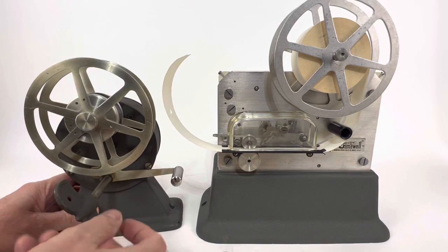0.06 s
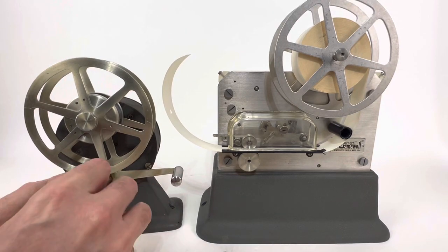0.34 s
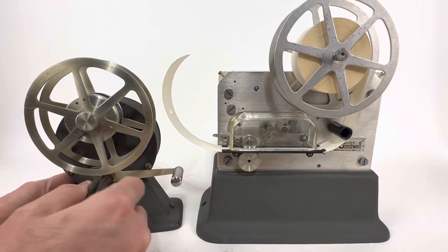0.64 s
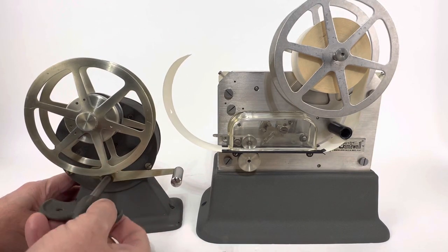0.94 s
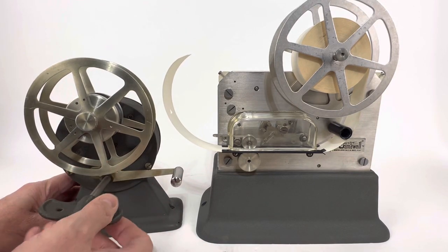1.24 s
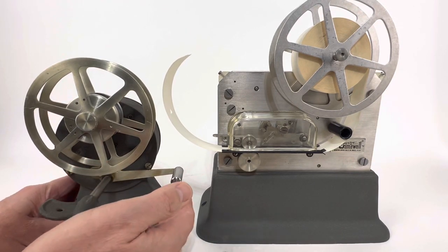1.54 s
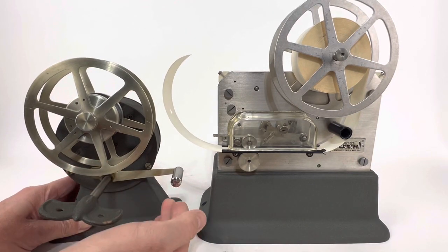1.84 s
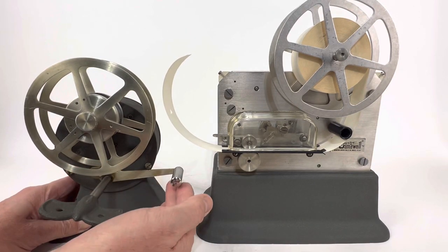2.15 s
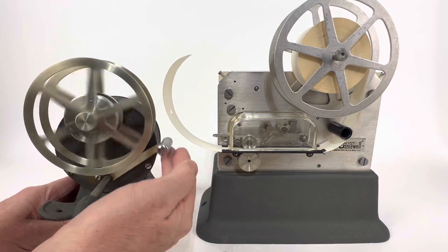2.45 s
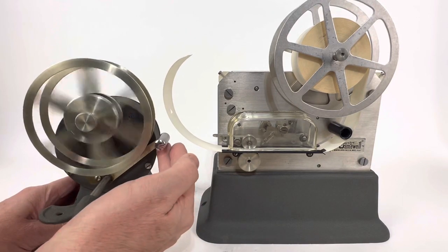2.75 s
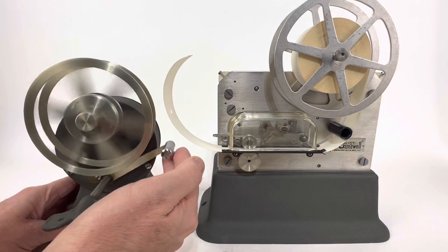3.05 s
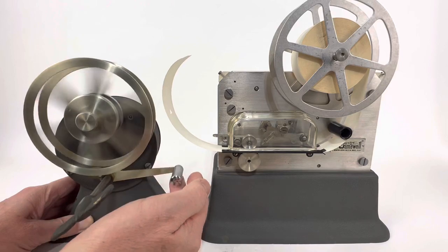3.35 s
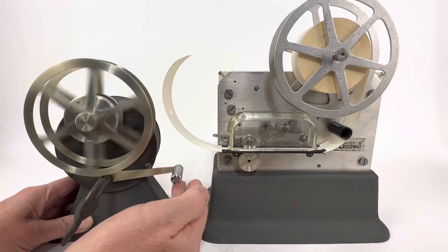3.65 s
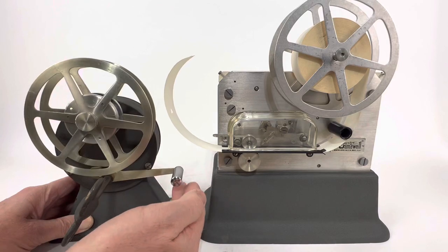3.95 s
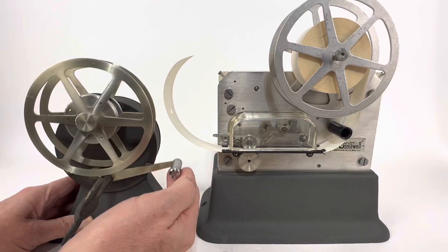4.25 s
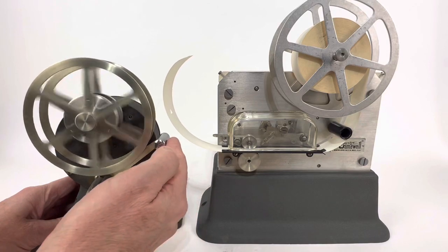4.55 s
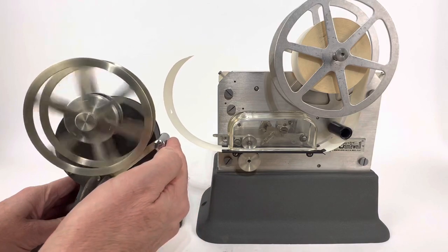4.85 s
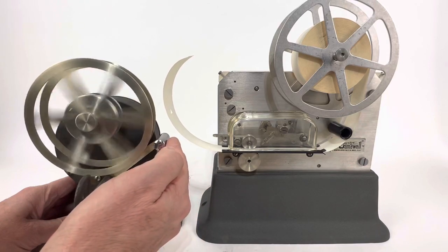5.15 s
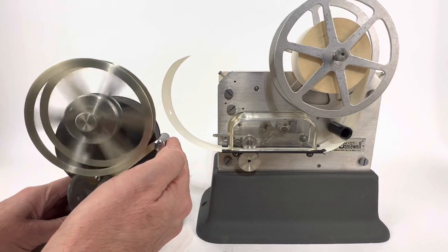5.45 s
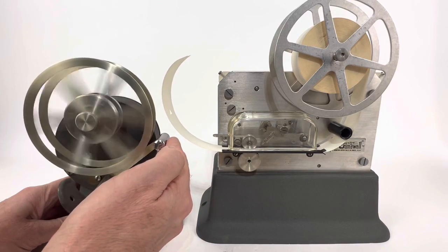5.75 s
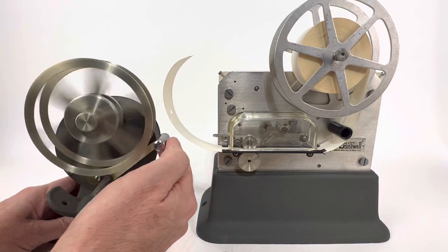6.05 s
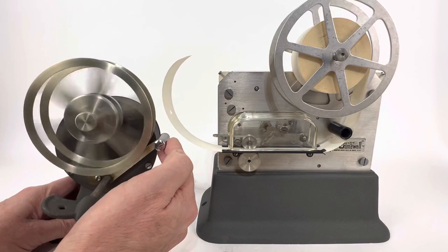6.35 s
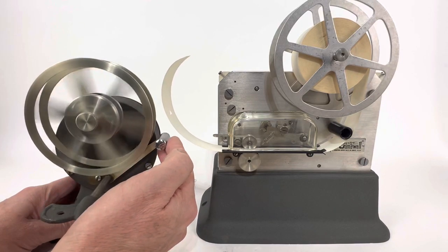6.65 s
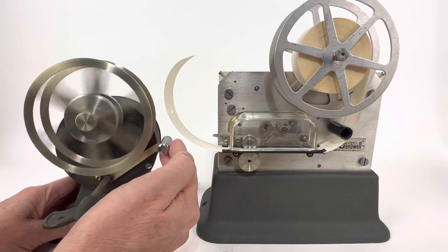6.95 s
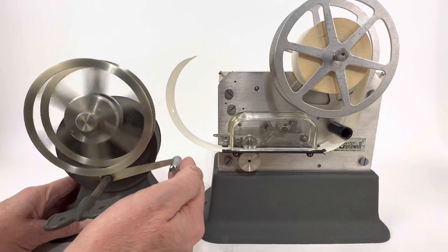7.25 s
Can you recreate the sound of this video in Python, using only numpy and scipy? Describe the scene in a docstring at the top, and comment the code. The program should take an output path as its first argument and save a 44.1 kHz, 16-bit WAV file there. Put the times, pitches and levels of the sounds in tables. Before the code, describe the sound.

Hands work an old telegraph's metal reel: quick ratchet clicks, then two whirring spins with knocks and pings over a low hum.

```python
"""In a small room with a low mains hum, hands work the tape reel of an old telegraph on a table.
Fingers slide on the stand, its foot bumps the table and its fitting clicks round, tooth by tooth.
Twice the brake arm snaps up and the reel gathers speed, whirring on its bearing. The wobbling wheel
brushes its mount once a turn, and knocks or pings when the wobble is worst, until the brake drops back."""
import sys
import numpy as np
from scipy import signal
from scipy.fft import rfft, irfft, next_fast_len
from scipy.io import wavfile
from scipy.ndimage import map_coordinates

SR = 44100
rng = np.random.default_rng(int(sys.argv[2]) if len(sys.argv) > 2 else 0)


def store_pcm(level_fs):
    """Save levels as 16-bit WAV."""
    pcm = np.round(np.clip(level_fs, -1, 1) * 32767).astype(np.int16)
    wavfile.write(sys.argv[1], SR, np.atleast_2d(pcm).T)


N = 330750  # 7.5 s

# notes of the spoked wheel: f/Hz, level/dB, fade/s (a fade is the time taken to drop by 60 dB)
WHEEL_NOTES = [(418, -10, .2), (740, -6, .09), (1168, -5, .16), (1630, -1, .06), (1955, -1, .1),
               (2170, -3, .14), (2505, -5, .19), (2752, -4, .1), (3385, 1.5, .06), (3570, 0, .06),
               (3900, -3, .1), (4130, -4, .1), (5030, -13, .25), (6385, -10, .1)]
# thin notes of the stand's fitting: f/Hz, level/dB, fade/s
FITTING_NOTES = [(2476, -8, 0.7), (3451, 0, 0.5)]
# tone colour of the wheel brushing its mount: f/Hz, level/dB
BRUSH_COLOUR = [(1500, -3.5), (2000, 5), (2900, -12.5), (4200, -1), (5600, -4.5), (8000, -18.5),
                (10200, -6.5), (11800, -5), (13500, -23), (15200, -21.5)]


def amp(db):
    """Turn decibels into a gain."""
    return 10 ** (np.asarray(db) / 20)


def unit(x):
    """Scale a long sound to an average (rms) level of 1."""
    return x / np.sqrt(np.mean(x ** 2) + 1e-20)


def normed(x):
    """Scale a short sound to a total energy of 1."""
    return x / (np.linalg.norm(x) + 1e-20)


def along(points, hz):
    """Read a curve of (f/Hz, value) points, with octaves evenly spaced."""
    f, values = np.transpose(points)
    return np.interp(np.log(hz + 1), np.log(f + 1), values)


def wobble(rate):
    """A smooth curve through rate random values a second."""
    return map_coordinates(rng.standard_normal(int(N * rate / SR) + 4), [np.arange(N) * rate / SR])


def coloured(x, level):
    """Turn each frequency up or down by level(hz) decibels."""
    n = x.shape[-1]
    size = 2 * next_fast_len(n // 2 + 4096)
    cepstrum = irfft(np.log(amp(level(np.fft.rfftfreq(size, 1 / SR)))), size)
    # this fold keeps the filter from sounding before its input
    cepstrum[1:size // 2] *= 2
    cepstrum[size // 2 + 1:] = 0
    return irfft(rfft(x, size) * np.exp(rfft(cepstrum)), size)[..., :n]


def shaped(x, colour):
    """Give a sound a tone colour made of (f/Hz, level/dB) points."""
    return coloured(x, lambda hz: along(colour, hz))


def tilted(x, bright_db):
    """Brighten a touch by about bright_db an octave; its energy comes out as 1."""
    return normed(coloured(x, lambda hz: bright_db * np.log2((hz + 200) / 2000)))


def noise(colour):
    """Steady noise with a tone colour."""
    return unit(shaped(rng.standard_normal(N), colour))


def add(track, s, sound):
    """Mix a sound in at s seconds."""
    part = track[max(round(s * SR), 0):][:len(sound)]
    part += sound[:len(part)]


def from_left(x):
    """A sound reaches the left ear 12 samples before the right."""
    return np.array([x, np.pad(x, (12, 0))[:N]])


def ring(notes):
    """An object rings with its own notes, a little differently at every touch."""
    t = np.arange(SR // 2) / SR
    hz, db, fade = np.transpose(notes)[:, :, None]
    strength = amp(db + rng.standard_normal(hz.shape) - 60 * t / fade)
    return normed(np.sum(strength * np.sin(2 * np.pi * (hz * t + rng.random(hz.shape))), axis=0))


def contact(colour, rise_s, crack_s, body_s, body_db, tilt_db=0):
    """Two hard things meet: a crack fades in crack_s, the frame's dense ring in body_s."""
    def level(hz):
        bass_cut = 40 * np.log10((hz + 1) / (hz + 100))
        return along(colour, hz) + tilt_db * np.log2((hz + 200) / 2000) + bass_cut

    t = np.arange(SR // 2) / SR
    onset = 1 - np.exp(-t / rise_s)
    decay = amp(-60 * t / crack_s) + amp(body_db - 60 * t / body_s)
    return normed(coloured(onset * decay * rng.standard_normal(len(t)), level))


def room_tone():
    """Mains hum lies over the room's dull rumble; the bass is mostly shared by both ears."""
    tones = [(119.9, -39), (146.5, -59), (365.8, -59.5)]  # steady tones in the room: f/Hz, level/dB
    air = [(20, -32), (45, -1.5), (95, 0), (180, -8.5), (330, -9), (550, -20.5), (1250, -22), (2000, -28),
           (3000, -41), (7500, -51), (15000, -67)]  # colour of the rumble: f/Hz, level/dB
    t = np.arange(N) / SR
    hum = np.zeros(N)
    for hz, db in tones:
        hum += amp(db + 1.4 * wobble(3.2)) * np.sqrt(2) * np.sin(2 * np.pi * (hz * t + rng.random()))
    spread = shaped(np.array([noise(air), noise(air)]), [(100, -15), (500, -3), (2000, -1)])
    shared = shaped(noise(air), [(100, 1), (500, -17.5), (2000, -15.5)])
    return from_left(hum + amp(-46) * shared) + amp(-44) * spread


def fingers():
    """Skin hisses over the stand in short strokes; the first leaves the fitting ringing."""
    rubs = [(0.0, -52), (1.402, -49.5), (1.841, -65)]  # finger strokes at their loudest: t/s, level/dB
    skin = [(300, -29), (2000, -6), (4500, -2.5), (8000, -5.5), (12000, -12), (16000, -17)]  # f/Hz, level/dB
    rise_db_per_s, fall_db_per_s = 240, 340
    t = np.arange(N) / SR
    strokes = sum(amp(db - np.maximum(rise_db_per_s * (s - t), fall_db_per_s * (t - s))) for s, db in rubs)
    out = strokes * amp(1.3 * wobble(45)) * noise(skin)
    add(out, rubs[0][0], amp(-26) * ring(FITTING_NOTES))
    return out


def bumps():
    """The held stand touches the table with a dull, toneless bump."""
    touches = [(0.434, -13.5), (6.806, -12)]  # the foot meets the table: t/s, level/dB
    foot = [(300, -9.5), (700, 1), (1300, -2.5), (2000, -10), (4500, -15.5), (9000, -38)]  # colour of the bump: f/Hz, level/dB
    out = np.zeros(N)
    for s, db in touches:
        add(out, s, amp(db) * contact(foot, rise_s=.0035, crack_s=.047, body_s=.089, body_db=-5.5))
    return out


def ratchet():
    """A catch strikes each small tooth and again as it settles behind it; the hollow base answers."""
    teeth = [(0.536, 0, -0.5), (0.583, 1.5, 1.4), (0.632, 1, 0.5), (0.685, 1, 0.5), (0.745, 3, 0.8),
             (0.806, 1, 0.1), (0.852, 1.5, 0), (0.908, 0.5, 0.5), (0.974, 3.5, 1.7), (1.043, -5, -3.5)]  # teeth slipping past: t/s, level/dB, brightness/(dB per octave)
    tooth_colour = [(250, -10), (450, -5.5), (650, -2.5), (880, -0.5), (1300, -0.5), (1550, -6.5),
                    (1900, -3), (2750, -15), (4600, -5.5), (6800, -4), (9000, -14.5), (9900, -3),
                    (10500, -18), (11900, -4), (13700, -16.5), (15200, -17.5)]  # colour of one click: f/Hz, level/dB
    catch_notes = [(3960, -3, .04), (6800, 2, .03), (7650, 0, .03), (11850, 0, .045)]  # notes of the catch: f/Hz, level/dB, fade/s
    base_notes = [(790, -2, .03), (897, 0, .04), (1230, 0, .03)]  # notes of the stand's base: f/Hz, level/dB, fade/s
    settle_s, settle_db, base_rise_s = .0028, -2, .01
    out, t = np.zeros(N), np.arange(SR // 2) / SR
    for s, db, bright_db in teeth:
        for delay, loss_db in ((0, 0), (settle_s, settle_db)):
            tooth = contact(tooth_colour, rise_s=.0007, crack_s=.014, body_s=.06, body_db=-18)
            click = tilted(tooth + amp(-13) * ring(catch_notes), bright_db)
            add(out, s + delay, amp(db + loss_db - 3.5) * click)
        base = normed((1 - np.exp(-t / base_rise_s)) ** 2 * ring(base_notes))
        add(out, s, amp(db) * (amp(-13) * base + amp(-20) * ring(WHEEL_NOTES)))
    # the last tooth leaves the fitting ringing
    add(out, teeth[-1][0], amp(-27.5) * ring(FITTING_NOTES))
    return out


def brake():
    """The springy arm clacks off the wheel and rings; dropping back onto it, it is muffled."""
    snaps = [(2.485, 5, 1.3, -12), (4.396, -2.5, -1.5, -2.5), (7.326, -1, 0, -37)]  # the arm snaps: t/s, level/dB, brightness/(dB per octave), ring/dB
    arm_colour = [(250, -14.5), (430, 1.5), (550, -11), (780, 3.5), (1020, -5), (1430, 1), (2300, -7),
                  (3300, -8.5), (4700, -7), (7200, -9.5), (8900, -14), (9500, -8), (12200, -10),
                  (13700, -19.5), (15500, -12.5)]  # colour of the clack: f/Hz, level/dB
    arm_notes = [(760, -5, 0.06), (1410, 1, 0.06), (3250, 3, 0.06), (3450, -2, .05), (6700, -4, 0.09),
                 (7560, -2, .055), (11900, -7, .08)]  # notes of the arm, cut short by the hand: f/Hz, level/dB, fade/s
    out = np.zeros(N)
    for s, db, bright_db, ring_db in snaps:
        clack = contact(arm_colour, rise_s=.0005, crack_s=.022, body_s=.15, body_db=-12.5,
                        tilt_db=bright_db)
        add(out, s, amp(db) * (clack + amp(ring_db) * ring(arm_notes) + amp(-13) * ring(WHEEL_NOTES)))
    return out


def spin_speed(release, braked, spin_up, stop_s=.13):
    """Share of top speed: the freed reel speeds up ever more slowly, until the brake halts it."""
    t = np.arange(N) / SR
    gathering = 1 - np.exp(-np.maximum(t - release, 0) / spin_up)
    return gathering * np.clip(1 - (t - braked) / stop_s, 0, 1)


def grinding(colour, grain_db):
    """Rubbing makes noise that comes in tiny uneven grains."""
    return unit(shaped(rng.standard_normal(N) * amp(grain_db * wobble(400)), colour))


def grit(specks_per_s=110):
    """Specks of uneven size tick under the rubbing rim."""
    specks = (rng.random(N) < specks_per_s / SR) * amp(3 * rng.standard_normal(N))
    return unit(shaped(specks, BRUSH_COLOUR))


def fuzzy_tone(hz, width_hz):
    """A narrow band of noise that follows the pitch hz."""
    phase = 2 * np.pi * np.cumsum(hz) / SR
    return unit(wobble(width_hz) * np.cos(phase) + wobble(width_hz) * np.sin(phase))


def moan(turns, start_hz, lasting_turns=8, sag_hz_per_turn=13):
    """The dry axle's hoarse moan sets in after one turn, sinks and dies as the reel runs free."""
    progress = np.clip((turns - 1) / lasting_turns, 0, 1)
    swell = np.abs(np.sin(np.pi * progress)) ** .25
    hoarseness = amp(2.5 * wobble(120))
    return swell * unit(hoarseness * fuzzy_tone(start_hz - sag_hz_per_turn * turns, width_hz=135))


def reel():
    """The bearing whirs and the wobbling wheel brushes its mount each turn; both make the wheel sing."""
    # spins: release/s, braked/s, top speed/(turns per s), spin-up/s, brush angle/turns, worst wobble/s,
    # easing either side of it/(dB per s), whir/dB, brush/dB, moan/dB, moan pitch/Hz, rim note/dB
    spins = [(2.485, 3.593, 9.92, .16, 0.65, 3.45, 18, -43.5, -43, -47.5, 770, -42),
             (4.397, 7.327, 9.82, .76, 0.62, 6.057, 10.5, -44.5, -50.5, -58.5, 730, -45.5)]
    scuffs = [(2.926, -50), (3.086, -47), (3.122, -43.5), (3.218, -39), (5.313, -47)]  # the wheel catches on its mount and scrapes: t/s, level/dB
    bearing = [(280, -13), (380, -9), (425, 2), (490, -10), (1200, -3.5), (2000, -6), (2900, -20),
               (3900, -14), (4900, -19.5), (5600, -30.5), (11800, -31), (15000, -55)]  # colour of the whir: f/Hz, level/dB
    mount_notes = [(1170, -5, .08), (1950, 0, .06), (2210, -3, .06), (2500, -6, .07), (3490, -3, .11),
                   (3900, -1, .1), (4280, -5, .06), (11700, -9, .05)]  # notes of the rubbed mount: f/Hz, level/dB, fade/s
    whir_swing_db, moan_swing_db, scuff_fade_s, rim_hz = 3.2, 6, .064, 1968
    t = np.arange(N) / SR
    load, pressure, axle, rim_rub = np.zeros((4, N))
    for (release, braked, top_speed, spin_up, angle, worst, easing,
         whir_db, brush_db, moan_db, moan_hz, note_db) in spins:
        speed = spin_speed(release, braked, spin_up)
        turns = top_speed * np.cumsum(speed) / SR
        friction = speed ** .8
        sway = amp(-easing * np.abs(t - worst))
        lean = np.cos(2 * np.pi * (turns - angle))
        nearness = (1 + lean) / 2  # 1 when the wheel leans closest to its mount
        load += friction * sway * amp(whir_db + whir_swing_db * lean)
        # the power on nearness narrows the brushing to a small part of each turn
        pressure += friction * sway ** 1.7 * amp(brush_db) * nearness ** 2.2
        # even the lightest rub draws out the rim's strongest note
        rim_rub += np.clip(turns - .5, 0, 1) * friction * sway ** .5 * amp(note_db) * nearness
        axle += amp(moan_db + moan_swing_db * (nearness - 1)) * moan(turns, moan_hz)
    for s, db in scuffs:
        add(pressure, s, amp(db - 60 * t[:SR] / scuff_fade_s))
    uneven, catching = amp(1.5 * wobble(25)), amp(1.2 * wobble(70))
    whir = load * uneven * grinding(bearing, grain_db=3)
    brush = pressure * catching * grinding(BRUSH_COLOUR, grain_db=2.5)
    singing = signal.fftconvolve(brush + amp(4.5) * whir, ring(WHEEL_NOTES))[:N]
    rim_note = rim_rub * fuzzy_tone(np.full(N, rim_hz), width_hz=85)
    ticks = pressure * amp(-3) * grit()
    mount = unit(signal.fftconvolve(rng.standard_normal(N), ring(mount_notes))[:N])
    chatter = pressure * catching * mount
    return whir + amp(-6) * brush + chatter + amp(-16) * singing + rim_note + ticks + axle


def knocks():
    """Heavy blows shake the stand and set the wheel ringing; the table top thuds beneath them."""
    # wheel and stand knock: t/s, level/dB, table thud/dB, brightness/(dB per octave), stand ring/dB
    blows = [(3.279, 9.5, -16, 0.5, -5), (3.283, -12.5, -35.5, 2, -17), (3.38, -1, -21.5, 0, -12),
             (3.479, 3.5, -19.5, 0, -7), (3.584, 10, -13, -0.5, -8), (3.705, -14, -23.5, -7.5, -13),
             (7.356, -5.5, -21.5, -4, -23), (7.39, -5.5, -37, -5.5, -7.5)]
    stand_colour = [(230, -9), (400, -3), (550, -11), (750, -4), (1000, -9.5), (1400, -6.5), (1750, 1.5),
                    (3000, -10.5), (3450, -2.5), (4800, -9.5), (8000, -17.5), (12000, -16), (15500, -34.5)]  # colour of a blow: f/Hz, level/dB
    stand_notes = [(1700, 2, .055), (1900, 5, .05), (2485, -5.5, .36), (3780, -1, .09)]  # notes of the struck stand: f/Hz, level/dB, fade/s
    table_notes = [(92, -7), (112, -1.5), (136, 0.5), (200, -16.5), (249, -10.5)]  # low notes of the table top: f/Hz, level/dB
    out, t = np.zeros(N), np.arange(SR // 2) / SR
    for s, db, thud_db, bright_db, ring_db in blows:
        blow = contact(stand_colour, rise_s=.00034, crack_s=.023, body_s=.17, body_db=-7.5)
        metal = tilted(blow + amp(-4) * ring(WHEEL_NOTES), bright_db)
        add(out, s, amp(db) * (metal + amp(ring_db) * ring(stand_notes)))
        swell = (1 - np.exp(-t / .015)) ** 2 * amp(thud_db - 60 * t / .16)
        thud = sum(amp(level) * np.sin(2 * np.pi * (hz * t + rng.random())) for hz, level in table_notes)
        add(out, s, swell * thud)
    return out


def pings(rebound_s=.015):
    """The rim grazes the brake arm's roller once a turn and rebounds; each touch builds up briefly."""
    grazes = [(6.099, 0.5, 0.5), (6.212, -1, 2), (6.329, -1, -18.5)]  # the rim meets the roller: t/s, level/dB, rebound against first touch/dB
    rim_colour = [(400, -33), (1500, -22.5), (1950, 6), (2150, -5), (2800, -16.5), (3600, 6.5), (4400, -9),
                  (5100, 6), (5700, -10), (6600, -10), (9500, -9), (12000, -9), (13700, -17), (15300, -18)]  # colour of a graze: f/Hz, level/dB
    roller_notes = [(1954, 7.5, .085), (3520, 2, .07), (3900, 6.5, .07), (5050, 2, .29), (5170, -1, .065),
                    (6200, -6, .15), (6550, -3, .1), (8130, -14, .22)]  # notes of the steel roller: f/Hz, level/dB, fade/s
    out, t = np.zeros(N), np.arange(SR // 2) / SR
    for s, db, rebound_db in grazes:
        for delay, change_db in ((0, 0), (rebound_s, rebound_db)):
            graze = contact(rim_colour, rise_s=.004, crack_s=.035, body_s=.1, body_db=-16.5)
            roller = amp(2) * (1 - np.exp(-t / .0019)) * ring(roller_notes)
            add(out, s + delay, amp(db + change_db) * (graze + roller))
    return out


def walls(x):
    """The walls send back a short echo, 5 ms late and different at each ear."""
    fades = [(120, 0.25), (500, 0.33), (3000, 0.14), (8000, 0.19), (15000, 0.053)]  # how long the room rings: f/Hz, fade/s
    hz, t, bands = signal.stft(rng.standard_normal((2, SR // 2)), SR, nperseg=256)
    tail = signal.istft(bands * amp(-60 * t / along(fades, hz)[:, None]), SR, nperseg=256)[1]
    tail = np.pad(tail / np.linalg.norm(tail[0]), ((0, 0), (round(.005 * SR), 0)))
    return signal.fftconvolve(x[None], tail, axes=1)[:, :N]


def scene():
    """The machine stands to the listener's left; each group of sounds gets its own echo."""
    balance = [(50, 1.5), (120, 5), (400, 4.5), (1300, 8), (2400, 6.5), (4400, 11), (7000, 13), (9500, 0),
               (13000, -4.5)]  # the nearer left ear mostly hears more: f/Hz, left minus right/dB
    # sound, echo/dB
    parts = [(ratchet(), -9), (brake(), -7), (knocks() + bumps(), -7), (pings(), -9),
             (reel() + fingers(), -7.5)]
    left, right = sum(from_left(part) + amp(echo_db) * walls(part) for part, echo_db in parts) + room_tone()
    return np.array([coloured(left, lambda hz: along(balance, hz) / 2),
                     coloured(right, lambda hz: -along(balance, hz) / 2)])


def record(dry):
    """The tallest peaks are rounded off and the very highest treble is cut."""
    ceiling, top_hz = 1.1, 15900
    rounded = dry / (1 + (dry / ceiling) ** 4) ** (1 / 4)
    return signal.sosfilt(signal.butter(20, top_hz, fs=SR, output="sos"), rounded)


dry = scene()
out = record(dry)
store_pcm(out)
```